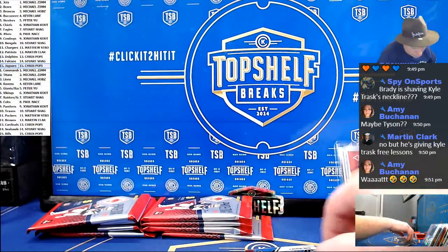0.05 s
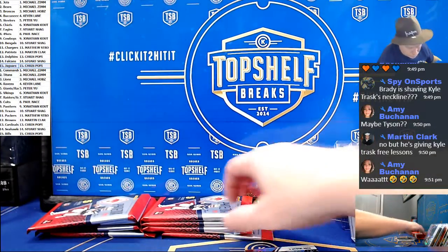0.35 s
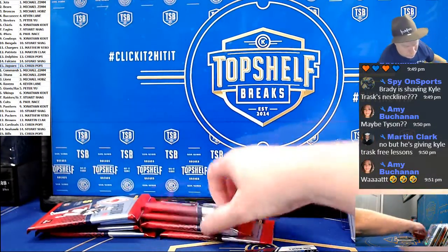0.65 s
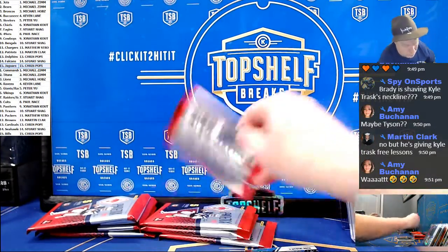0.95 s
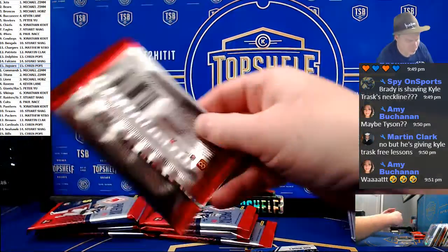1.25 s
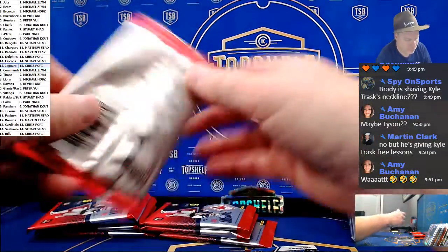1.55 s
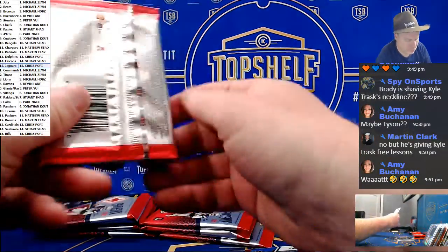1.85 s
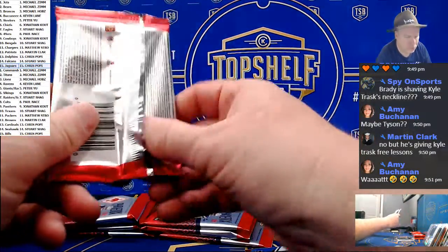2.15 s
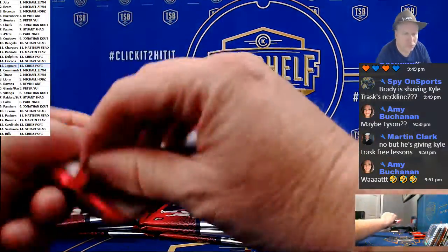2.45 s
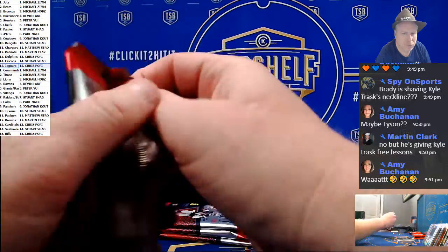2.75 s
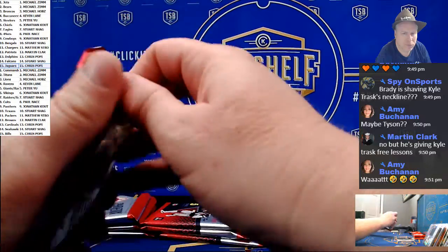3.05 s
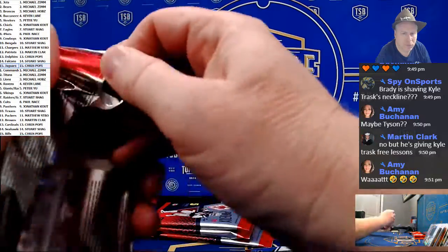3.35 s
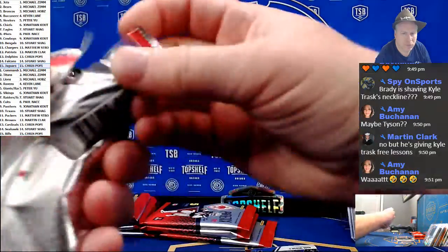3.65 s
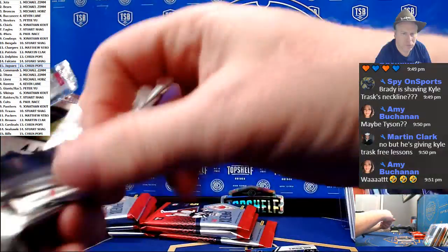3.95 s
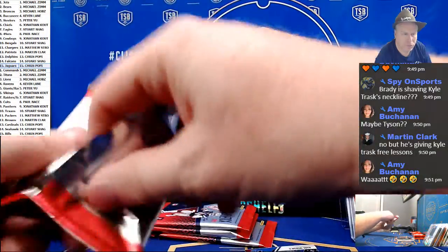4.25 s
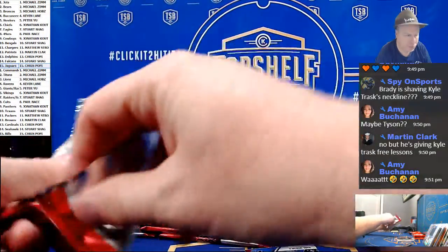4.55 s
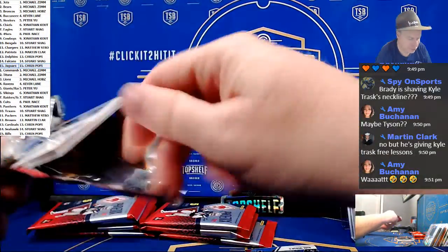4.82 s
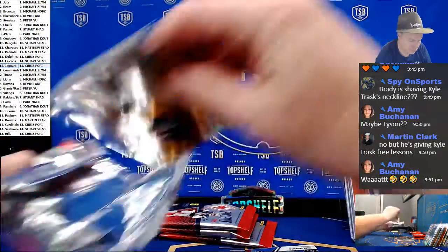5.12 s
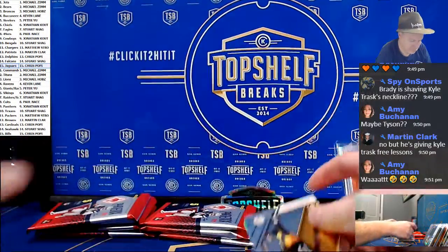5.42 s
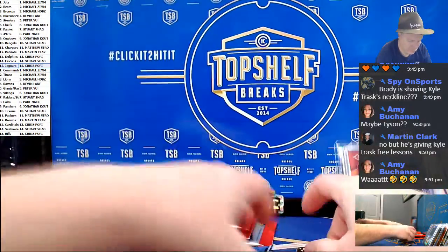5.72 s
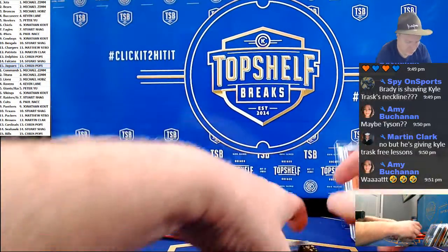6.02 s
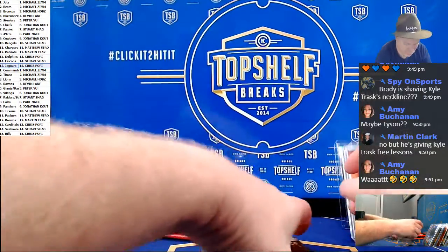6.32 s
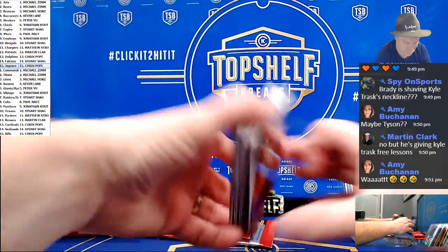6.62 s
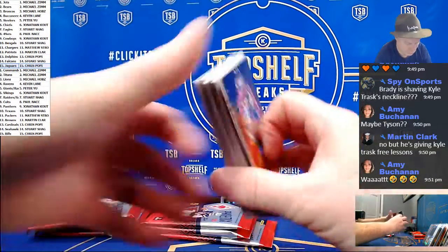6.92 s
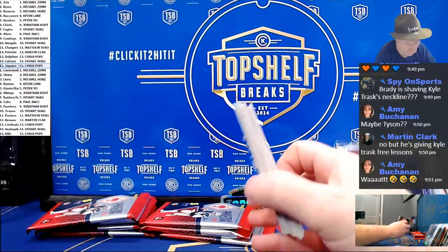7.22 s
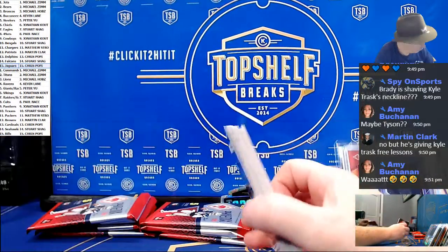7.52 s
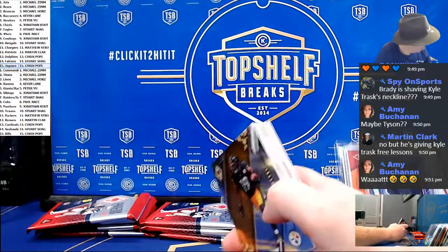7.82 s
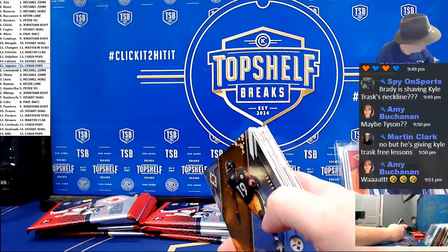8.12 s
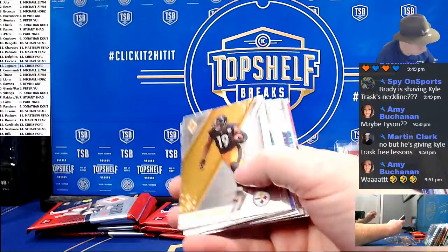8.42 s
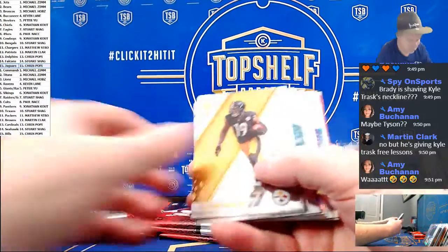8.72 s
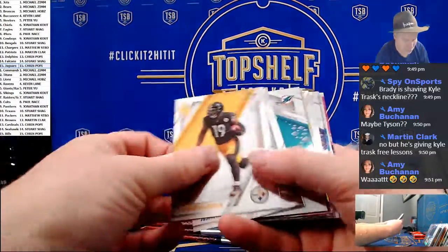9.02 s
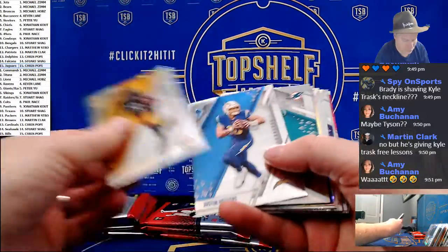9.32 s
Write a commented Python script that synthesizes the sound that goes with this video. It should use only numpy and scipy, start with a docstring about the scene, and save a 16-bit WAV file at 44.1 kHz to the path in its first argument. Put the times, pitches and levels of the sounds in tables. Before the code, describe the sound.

For the first second, a foil pack slides faintly off a pile with a few light clacks and a low bump of the table. From about 1.2 seconds the wrapper crinkles close by, thin and bright, growing louder as fingers squeeze it. A sharp rip comes near 3 seconds, with more short tears between 3.4 and 3.7 and a weaker one at 4.4. The loosened foil crackles more fully, then fades by 5.4. At 5.5 the cards land on a padded table with a soft thump, followed by faint rubbing. From about 6.9 to 8 seconds the stack is squared and fanned: hissing slides and crisp edge clacks, with a low thump at 7 and a sharp snap near 7.6. Only faint slides and ticks follow, until about 9. A low hum and slight table rumble lie underneath, with short small-room reflections.

```python
"""A faint slide and a few clacks: hands pick a foil pack of trading cards off a pile, close by.
The wrapper crinkles as its creases buckle, and rips as a tear runs along the seam. The cards are pulled out
and set down with a thump that excites the modes of a padded table. A stack is then picked up, slid together,
snapped square and fanned: friction hisses and edges clack. A small, humming room answers every snap."""
import sys
import numpy as np
from scipy import signal
from scipy.fft import rfft, irfft, next_fast_len
from scipy.io import wavfile
from scipy.ndimage import map_coordinates

SR = 44100
rng = np.random.default_rng(int(sys.argv[2]) if len(sys.argv) > 2 else 0)


def output_pcm(signal):
    """Save a mono or channel-first signal as 16-bit PCM at the path in sys.argv[1].

    Samples are clipped to [-1, 1] before scaling.
    """
    pcm = np.clip(np.atleast_2d(signal).T, -1, 1) * 32767
    wavfile.write(sys.argv[1], SR, np.round(pcm).astype(np.int16))


N = 413207
OPEN_S = 3.34  # the wrapper is taut before this time and slack after it

# Event levels are relative within each table; a source's gain_db shifts them all.
# the loudest creases buckling: start_s, level_db, body_re_level_db
CREASE_SNAPS = [(1.3106, -44, -8), (1.3432, -37, -12.5), (1.83, -41, -20), (1.897, -35, -20.5),
                (1.9193, -32, -30), (1.9553, -29.5, -39), (1.9928, -36, -39), (2.0394, -33, -20),
                (2.0992, -32.5, -16), (2.2868, -30.5, -19), (2.363, -38, -10), (2.44, -37.5, -18),
                (2.5428, -42, -12), (2.5646, -34, -20), (2.6295, -28.5, -20.5), (2.695, -36, -18),
                (2.736, -32.5, -24.5), (2.7993, -38.5, -12.5), (2.8573, -30, -18), (2.8659, -30.5, -24),
                (2.929, -28, -28.5), (2.9603, -18.5, -35.5), (2.964, -18.5, -28.5), (3.0319, -31, -20),
                (3.0756, -31.5, -23), (3.11, -32.5, -15), (3.1352, -26, -35), (3.183, -33, -14),
                (3.2279, -27, -16.5), (3.282, -24, -17), (3.3742, -26, -2.5), (3.469, -31.5, -34.5),
                (3.5138, -31, -15.5), (3.532, -26.5, -19), (3.6096, -29, -23), (3.6806, -26.5, -12.5),
                (3.74, -20.5, -6.5), (3.903, -33, -10), (3.9275, -21, -16.5), (3.9393, -21.5, -21),
                (3.9695, -21.5, -15.5), (4.0567, -33, -19.5), (4.1701, -21, -20), (4.178, -27, -11.5),
                (4.2103, -27.5, -7.5), (4.3757, -31.5, -8.5), (4.3926, -34.5, -9), (4.4275, -26.5, -6.5),
                (4.502, -25.5, -15), (4.5589, -29, -22), (4.796, -44, -17), (4.8352, -39, -15),
                (4.8929, -37, -15), (5.0179, -33, -20), (5.121, -33, -37), (5.1795, -46, -0.5),
                (5.246, -52.5, -13), (5.3075, -52.5, -0.5), (5.3863, -61, 8)]
# fingers squeezing the wrapper: start_s, length_s, treble_db, swell_db
FINGER_SQUEEZES = [(1.203, 0.24, -56, -8), (1.541, 0.053, -54.5, -6), (1.615, 0.16, -70.5, 15.5),
                   (1.878, 0.2, -51, 13), (2.115, 0.099, -54, 12.5), (2.281, 0.15, -49.5, -9),
                   (2.514, 0.22, -52, 5.5), (2.836, 0.51, -48.5, -4.5), (3.331, 0.26, -51, 3),
                   (3.622, 0.14, -42, 4), (3.809, 0.076, -48, 0.5), (3.893, 0.12, -49, -1),
                   (4.06, 0.17, -46.5, -1.5), (4.253, 0.13, -50.5, 1), (4.363, 0.22, -45, 9),
                   (4.654, 0.16, -65, 4), (4.774, .14, -50.5, 11.5), (5.018, .02, -57.5, -6),
                   (5.085, 0.061, -54.5, 8.5)]
# spectra of sealed foil, opened foil and card: frequency_hz, density_db
TAUT_SPECTRUM = [(150, -49.5), (250, -23.5), (298, -31.5), (386, -17.5), (607, -15), (1580, -19),
                 (1950, -9), (2760, -7.5), (3340, -0.5), (4120, 0), (4730, -5.5), (6040, -5.5), (6820, -9),
                 (10000, 0), (16000, -20)]
SLACK_SPECTRUM = [(150, -41), (250, -15), (538, -4.5), (586, -1), (775, -10.5), (906, -5), (1380, -10),
                  (2400, -3), (2670, -6), (3170, -2.5), (4050, -2), (4900, -6.5), (7190, -4.5), (9830, 5.5),
                  (16000, -15)]
CARD_SPECTRUM = [(180, -8), (330, -10), (520, -5.5), (1300, -11), (2500, -8), (4500, -7), (7000, -9.5),
                 (10100, 0), (12500, -12), (16000, -15)]


def snaps(gain_db=1.5, flutter_db=-23, flutter_t60=0.062, strain_db=-20, strain_s=0.0034):
    """Snap-through buckling: a crease creaks under strain, flips in about 2 ms, and the sheet shivers."""
    lead_s = .01
    out, t = np.zeros(N), np.arange(SR // 20) / SR - lead_s
    after = np.maximum(t, 0)
    for start, db, body_db in CREASE_SNAPS:
        flip_s = 0.0019 * rng.uniform(.85, 1.35)
        flutter = amp(flutter_db) * fade(after, flutter_t60)
        crack = (1 - np.exp(-after / 0.00047)) * (np.exp(-(after / flip_s) ** 3) + flutter)
        creak = amp(strain_db) * np.exp(-abs(t) / strain_s)
        middle_db = wrapper_balance(start)[1] - 2  # less middle than the crinkle: thinner and brighter
        treble_db = -10 * np.log10(1 + amp(middle_db) ** 2)  # middle and treble share the level
        spectrum = TAUT_SPECTRUM if start < OPEN_S else SLACK_SPECTRUM
        sound = contact(crack + creak, spectrum, body_db - treble_db, middle_db, ring_db=3.5)
        add(out, start - lead_s - .0012, amp(db + gain_db + treble_db) * sound)
    return out


def crinkle(gain_db=-0.5, rub_db=-9):
    """Crackling noise: squeezed creases give way in clumps, over the friction hiss of foil on foil."""
    effort = np.zeros(N)
    for start, length, db, swell_db in FINGER_SQUEEZES:
        add(effort, start, amp(db) * stroke(length, swell_db, attack_s=.012, t60=0.22))
    grains = unit(facets(crackle(per_s=700, spread_db=3.4), t60=.008)) * amp(2.7 * wobble(110))
    body, middle, treble = foil(grains + amp(rub_db) * rng.standard_normal(N))
    body_db, middle_db = wrapper_balance(np.arange(N) / SR)
    return amp(gain_db) * effort * (amp(body_db) * body + amp(middle_db) * middle + treble)


def rips(edge_s=0.0051, middle_db=-1):
    """Fracture: a running tear breaks the foil in a dense, stuttering stream of cracks."""
    # the seam giving way and the wrapper being crushed: start_s, length_s, treble_db, body_re_treble_db
    tears = [(2.932, 0.052, -35.5, -25.5), (3.384, 0.081, -34, -11.5), (3.644, 0.027, -35.5, -18),
             (3.695, 0.047, -31, -9), (4.418, 0.11, -44, -7.5)]
    out, t = np.zeros(N), np.arange(N) / SR
    cracks = facets(crackle(per_s=3000, spread_db=1.8), t60=.006) * amp(3.2 * wobble(170))
    body, middle, treble = foil(cracks)
    for start, length, db, body_db in tears:
        pull = np.clip((t - start) / edge_s, 0, 1)
        pull *= np.clip((start + length - t) / (2 * edge_s) + .5, 0, 1)
        out += amp(db) * pull * (amp(body_db) * body + amp(middle_db) * middle + treble)
    return out


def wrapper_resonance(x, count=10, ring_db=3, centre_t60=.034, centre_hz=1900):
    """Modal ringing: the wrapper's resonances shift as fingers reshape it, here 24 times a second."""
    out, t, step = x.copy(), np.arange(SR // 16) / SR, SR // 24
    for start in range(int(FINGER_SQUEEZES[0][0] * SR), int(CREASE_SNAPS[-1][0] * SR) + step, step):
        hz = np.minimum(centre_hz * np.exp(.75 * rng.standard_normal((count, 1))), 11000)
        decay = fade(t, centre_t60 * (centre_hz / hz) ** .5)  # higher modes die sooner
        modes = 2 * decay / decay.sum(axis=1, keepdims=True) * np.sin(2 * np.pi * hz * t)
        polarity = rng.choice([-1, 1], count)
        add(out, start / SR, amp(ring_db) * signal.fftconvolve(x[start:start + step], polarity @ modes))
    return out


def wrapper_balance(time_s):
    """Spectral balance: the wrapper's body and middle levels follow the stage of opening."""
    # handled sealed, torn along the seam, peeled open: start_s, body_re_treble_db, middle_re_treble_db
    stages = [(0, -15, -9.5), (1.8, -18, -6.5), (2.999, -15.5, 0.5), (3.5, -10, -3.5), (4.001, -10, -4),
              (4.3, -8.5, -3.5)]
    start, body_db, middle_db = np.transpose(stages)
    k = np.maximum(np.searchsorted(start, time_s) - 1, 0)
    return body_db[k], middle_db[k]


def foil(x):
    """Tension colours a sheet: the three registers of the wrapper, first taut, then slack."""
    return np.where(np.arange(N) < OPEN_S * SR, registers(x, TAUT_SPECTRUM), registers(x, SLACK_SPECTRUM))


def clacks(gain_db=3):
    """Damped impact: stiff card edges strike and die away quickly in the hand."""
    # card edges and packs striking: start_s, treble_db, body_re_treble_db, t60_s
    strikes = [(0.071, -57.5, -15, 0.047), (0.3429, -53, -5, 0.023), (.542, -61, 16, .077),
               (0.603, -47.5, -3, 0.013), (0.646, -58.5, 16.5, 0.0057), (1.223, -50, -7, 0.13),
               (1.239, -44.5, -3.5, 0.03), (5.533, -73.5, 25.5, 0.093), (6.665, -76.5, 18, .068),
               (6.9664, -45, -9, 0.026), (6.9826, -39.5, -4, 0.036), (6.9916, -33.5, -4, 0.0087),
               (7.113, -34.5, -12, .025), (7.1261, -35.5, -9, 0.023), (7.232, -44, -22, 0.056),
               (7.266, -39.5, -11.5, 0.015), (7.3036, -47, -3.5, 0.03), (7.337, -41.5, -14, 0.02),
               (7.3719, -33.5, -33, 0.016), (7.3941, -45, -4.5, 0.014), (7.5597, -33.5, -5, 0.018),
               (7.5666, -26.5, -28, 0.011), (7.572, -37, -8.5, 0.13), (7.5825, -44, -14, 0.11),
               (7.917, -44, -37, 0.067), (7.9259, -54.5, -5, 0.18), (8.6953, -71.5, 13.5, 0.019),
               (8.804, -62, -35, .11)]
    out, t = np.zeros(N), np.arange(SR // 8) / SR
    for start, db, body_db, t60 in strikes:
        envelope = fade(t, t60) * (1 - np.exp(-t / 0.000097))
        middle_db = min(3 + 0.56 * body_db, 6.5)  # a fuller blow has more middle, up to a limit
        sound = contact(envelope, CARD_SPECTRUM, body_db, middle_db, ring_db=-6)
        add(out, start - .0012, amp(db + gain_db) * sound)
    return out


def slides(gain_db=-1):
    """Sliding friction: smooth faces hiss with fine catches, unevenly as the grip changes."""
    # packs and cards sliding over each other: start_s, length_s, treble_db, swell_db, body_re_treble_db
    pushes = [(0, 0.29, -72, -2.5, 9), (0.253, .34, -66, 10, -2), (0.62, 0.072, -61, 14, -17),
              (0.79, 0.39, -70, 7.5, -4.5), (5.722, 0.29, -80, -6.5, 8.5), (6.396, 0.33, -80, 16, 0),
              (6.907, 0.2, -54, 13.5, -12.5), (7.081, .16, -51, 8, -12), (7.303, 0.11, -56, 4, -9.5),
              (7.577, 0.054, -48, -9.5, -11), (7.772, 0.07, -59.5, 9, -10.5),
              (7.92, 0.28, -68.5, -3.5, -14.5), (8.449, 0.058, -69, -1.5, -7.5),
              (8.562, 0.22, -86, 5.5, -3), (9.09, .02, -83.5, -1, -5)]
    catches = unit(facets(crackle(per_s=450, spread_db=2.3), t60=.008))
    friction = (rng.standard_normal(N) + .75 * catches) * amp(1.4 * wobble(45))
    drive = np.zeros((3, N))
    for start, length, db, swell_db, body_db in pushes:
        push = amp(db) * stroke(length, swell_db, attack_s=0.023, t60=0.28)
        middle_db = -2.5 + 0.29 * body_db  # a heavier slide has more middle
        for track, register_db in zip(drive, (body_db, middle_db, 0)):
            add(track, start, amp(register_db) * push)
    return amp(gain_db) * np.sum(drive * registers(friction, CARD_SPECTRUM), axis=0)


def thumps():
    """Modal response: soft blows set the table booming; the longer the contact, the duller the sound."""
    # blows on the padded table: start_s, level_db, contact_s
    blows = [(0.995, -52, 0.0054), (1.03, -43, 0.0099), (5.532, -30.5, 0.0018), (5.557, -28, 0.006),
             (6.993, -26, 0.0074)]
    # modes of the table: pitch_hz, level_db, t60_s
    modes = [(44.5, -2.5, 0.2), (64, -7, 0.27), (107.5, -4, 0.35), (188, -7.5, 0.15), (281, -10, 0.1),
             (375, -11, 0.16), (475, -6.5, 0.076)]
    out, t = np.zeros(N), np.arange(SR // 2) / SR
    for start, db, contact_s in blows:
        ring = np.zeros(len(t))
        for hz, mode_db, t60 in modes:
            strength = amp(mode_db) / (1 + (hz * contact_s / 2) ** 2)
            ring += strength * fade(t, t60) * np.sin(2 * np.pi * (hz * t + rng.random()))
        add(out, start, amp(db) * ring * (1 - np.exp(-t / contact_s)))
    return out


def rubs():
    """Friction-driven resonance: each soft rub swells and fades at the pitch of the thing touched."""
    # fingers and sleeves on pile, table and stack: peak_s, length_s, pitch_hz, width_hz, level_db
    touches = [(0.15, 0.98, 1900, 500, -76.5), (0.553, 0.008, 1300, 400, -47),
               (0.693, 0.041, 1020, 400, -56.5), (6.018, 0.28, 400, 125, -64),
               (6.132, 0.21, 142, 50.1, -59.5), (6.724, 0.39, 1807, 350, -76.5),
               (6.922, 0.015, 905, 299, -58.5), (7.941, 0.023, 438, 253, -52)]
    out, t = np.zeros(N), np.arange(SR) / SR - .5
    for peak, length, hz, width, db in touches:
        swell = np.exp(-2 * (t / length) ** 2)
        add(out, peak - .5, amp(db) * swell * narrow_noise(hz, width, size=SR))
    return out


def table_rumble(gain_db=-1):
    """Structure-borne noise: the table rumbles under the arms, and overlapping movements add in power."""
    # arms leaning and shifting: start_s, length_s, level_db
    leans = [(.33, 0.13, -53), (0.747, 0.19, -48.5), (0.975, .07, -31.5), (1.1, 0.49, -48.5),
             (1.953, 4.3, -52.5), (2.62, 0.072, -45), (3.383, .07, -37), (3.704, 0.084, -50),
             (4.956, 0.062, -39.5), (5.148, 0.61, -49.5), (6.35, 1.3, -58.5), (8.65, 1, -58.5),
             (7, 0.31, -49)]
    # spectrum of the rumble: frequency_hz, density_db
    spectrum = [(11, -24.5), (18, 3.5), (41, -4), (70, -21.5), (102, -16), (134, -28.5), (160, -26),
                (210, -57), (350, -120)]
    power = np.zeros(N)
    for start, length, db in leans:
        add(power, start, (amp(db) * stroke(length, 0, attack_s=0.022, t60=.35)) ** 2)
    return amp(gain_db) * np.sqrt(power) * coloured_noise(spectrum)


def reverberation(x, wet_db=-12, count=4):
    """Diffuse reflection: short room tails take turns, as the paths change when the hands move."""
    # reverberation time of the room: frequency_hz, t60_s
    decay_times = [(300, 0.4), (2000, 0.18), (5500, 0.23), (15000, 0.23)]
    hz, t, spectra = signal.stft(rng.standard_normal((count, SR // 2)), SR, nperseg=256)
    tails = signal.istft(spectra * fade(t, along(decay_times, hz)[:, None]), SR, nperseg=256)[1]
    tails *= 1 - np.exp(-np.arange(tails.shape[1]) / SR / 0.001)
    place = np.arange(N) // (SR // 8) % count
    return amp(wet_db) * sum(signal.oaconvolve(x * (place == k), tail / np.linalg.norm(tail))[:N]
                             for k, tail in enumerate(tails))


def background(air_db=-64):
    """Stationary noise: a broadband room floor with two narrow bands heard as a fuzzy hum."""
    # spectrum of the room noise: frequency_hz, density_db
    spectrum = [(25, -4.5), (45, -3.5), (75, -13.5), (120, -15.5), (160, -14.5), (250, -15), (400, -20),
                (650, -23.5), (1100, -34), (2000, -36), (4000, -41.5), (6500, -45.5), (10000, -38),
                (13000, -46.5), (16000, -51.5)]
    # hum tones: pitch_hz, width_hz, level_db
    hums = [(103.5, 21, -71), (232.6, 43, -69)]
    air = amp(air_db) * coloured_noise(spectrum)
    return air + sum(amp(db) * narrow_noise(hz, width, size=N) for hz, width, db in hums)


def contact(envelope, spectrum, body_db, middle_db, ring_db):
    """Source and filter: a flurry of vibration, coloured by its own broad resonance and the material."""
    centre = 5000 * np.exp(0.68 * rng.standard_normal())
    kick = np.pad(envelope * np.tanh(2 * rng.standard_normal(len(envelope))), (SR // 1000, 0))
    rung = filtered(kick, lambda hz: 1 + amp(ring_db) / (1 + 4j * (hz / centre - centre / (hz + 1))))
    return amp([body_db, middle_db, 0]) @ registers(rung, spectrum) * np.sqrt(np.mean(envelope ** 2))


def crackle(per_s, spread_db):
    """Poisson process: random tiny impulses, many weak and a few strong."""
    size = amp(spread_db * np.minimum(rng.exponential(size=N), 4))
    return (rng.random(N) < per_s / SR) * size * rng.standard_normal(N)


def facets(x, t60, count=6):
    """Impulse responses: each impulse lands on a random facet of the sheet with its own short ring."""
    t = np.arange(SR // 100) / SR
    rings = rng.standard_normal((count, len(t))) * fade(t, t60)
    facet = rng.integers(count, size=N)
    return sum(signal.oaconvolve(x * (facet == k), rings[k])[:N] for k in range(count))


def registers(x, spectrum, edges_hz=(1500, 6000)):
    """Crossover: x in a material's colour, split into body, middle and treble, each of rms 1."""
    def response(hz):
        body, below_treble = (1 / (1 + (hz / edge) ** 8) for edge in edges_hz)
        return amp(along(spectrum, hz)) * np.array([body, below_treble - body, 1 - below_treble])
    return unit(filtered(x, response))


def stroke(length, swell_db, attack_s, t60):
    """Envelope of a hand movement: quick rise, a hold that swells or sags, release."""
    t = np.arange(int((length + t60) * SR)) / SR
    hold = amp(swell_db * (np.minimum(t / length, 1) - .5))
    return np.minimum(t / attack_s, 1) * hold * fade(np.maximum(t - length, 0), t60)


def coloured_noise(spectrum):
    """Spectral shaping: noise of rms 1 with the given spectrum."""
    return unit(filtered(rng.standard_normal(N), lambda hz: amp(along(spectrum, hz))))


def narrow_noise(centre, width, size):
    """Resonance: noise of rms 1 in one narrow band."""
    return unit(filtered(rng.standard_normal(size), lambda hz: 1 / (1 + (2 * (hz - centre) / width) ** 2)))


def wobble(per_s):
    """Random modulation: a smooth curve with per_s knots a second."""
    return map_coordinates(rng.standard_normal(int(N * per_s / SR) + 4), [np.arange(N) * per_s / SR])


def filtered(x, response):
    """Linear filtering: multiply the spectrum of x by a frequency response."""
    n = x.shape[-1]
    padded = next_fast_len(n + min(n, 8192), real=True)
    return irfft(rfft(x, padded) * response(np.fft.rfftfreq(padded, 1 / SR)), padded)[..., :n]


def along(points, hz):
    """Interpolate (frequency_hz, value) points on a log axis."""
    frequencies, values = np.transpose(points)
    return np.interp(np.log(hz + 1), np.log(frequencies + 1), values)


def add(track, start_s, sound):
    """Superposition: mix a sound into a track."""
    part = track[max(round(start_s * SR), 0):][:len(sound)]
    part += sound[:len(part)]


def fade(t, t60):
    """Exponential decay, 60 dB in t60 seconds."""
    return np.exp(-np.log(1000) * t / np.maximum(t60, 1e-3))


def amp(db):
    """Decibels to gain."""
    return 10 ** (np.asarray(db) / 20)


def unit(x):
    """Scale to rms 1."""
    return x / np.sqrt(np.mean(x ** 2, axis=-1, keepdims=True) + 1e-20)


def scene():
    """Superposition: foil and cards with their reflections, over the table and the hum."""
    wrapper = wrapper_resonance(snaps() + crinkle() + rips())
    hands = wrapper + slides() + clacks() + rubs()
    return (hands + reverberation(hands) + thumps() + table_rumble() + background())[None]


def record(dry):
    """Band limiting: a steep low-pass at 16.1 kHz."""
    return filtered(dry, lambda hz: 1 / (1 + (hz / 16100) ** 120))


dry = scene()
out = record(dry)
output_pcm(out)
```